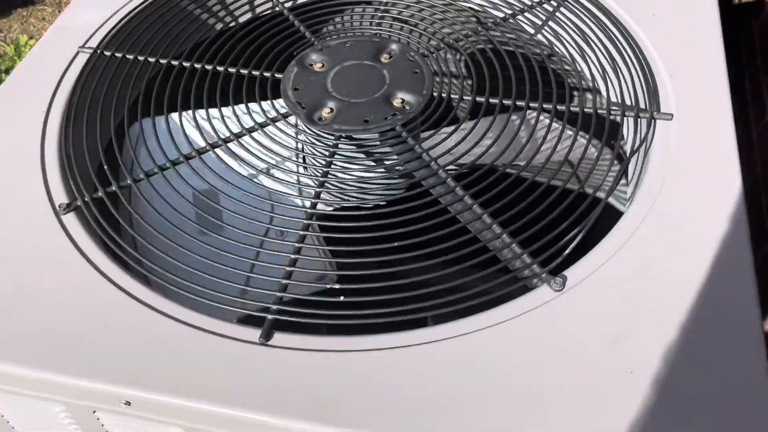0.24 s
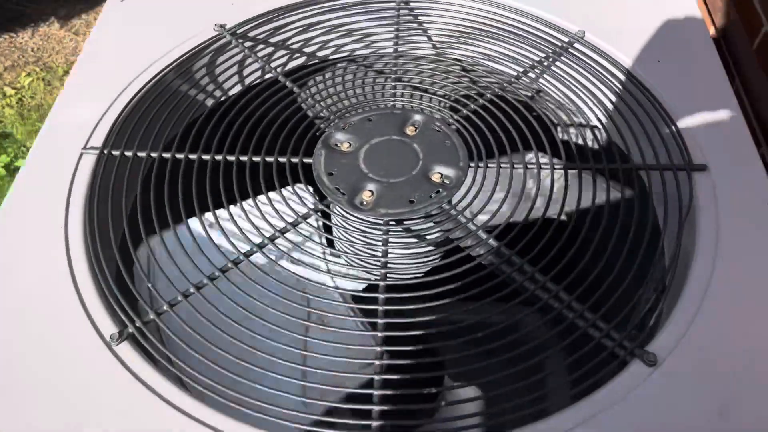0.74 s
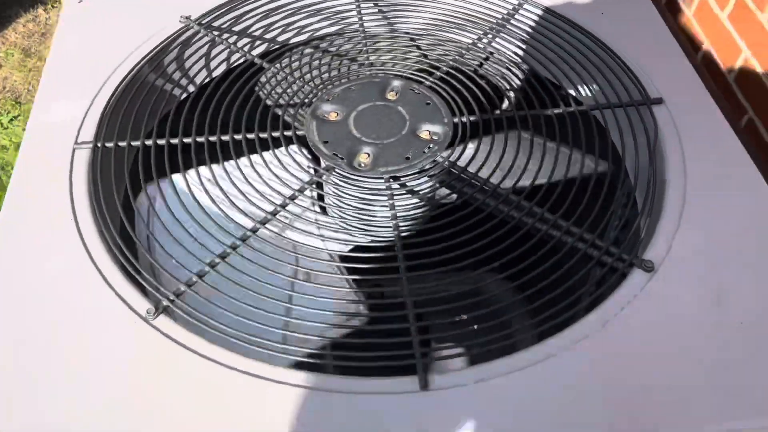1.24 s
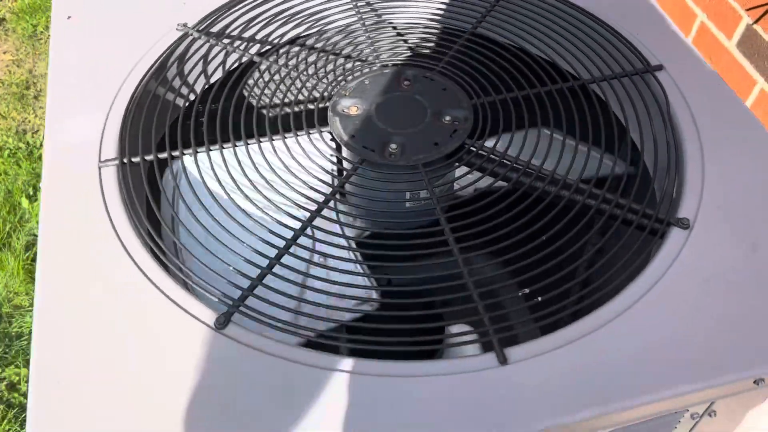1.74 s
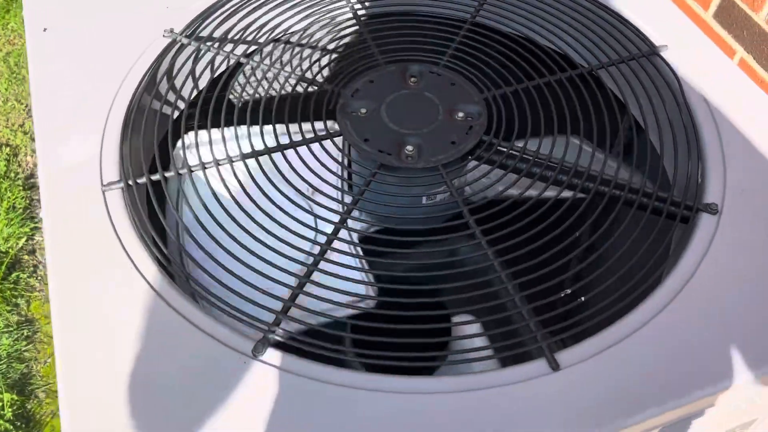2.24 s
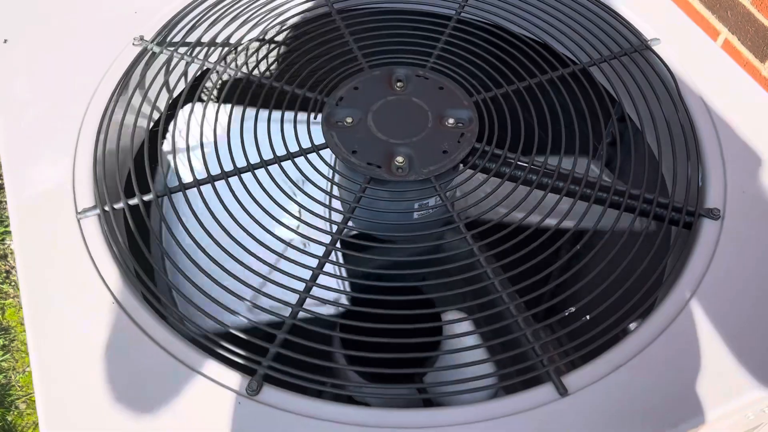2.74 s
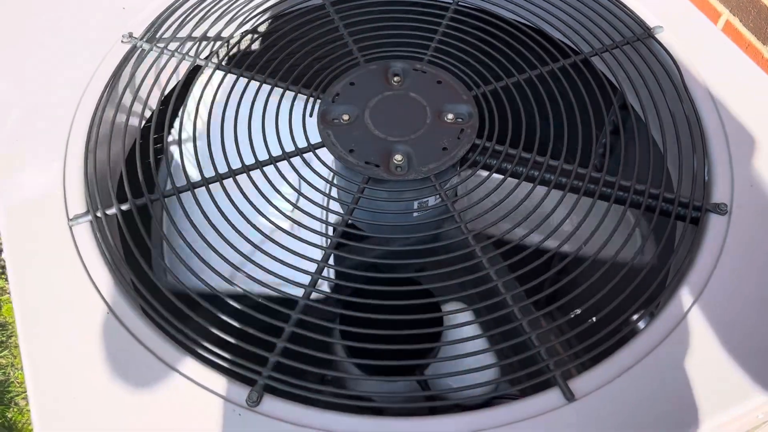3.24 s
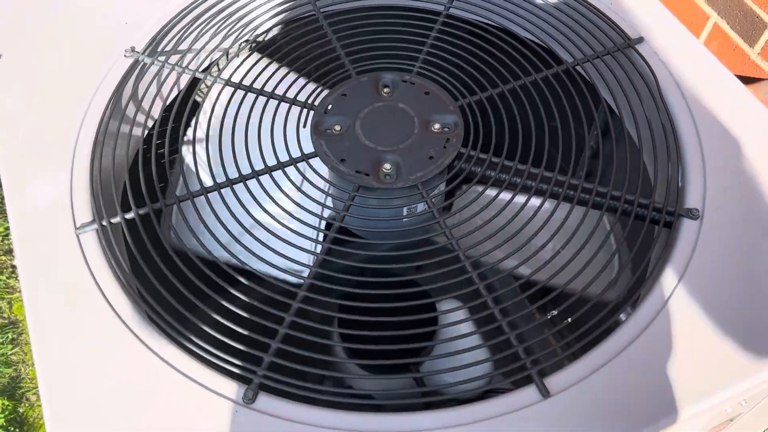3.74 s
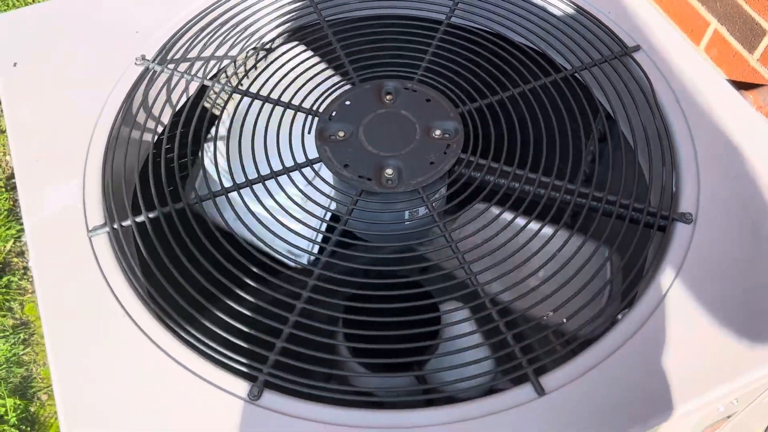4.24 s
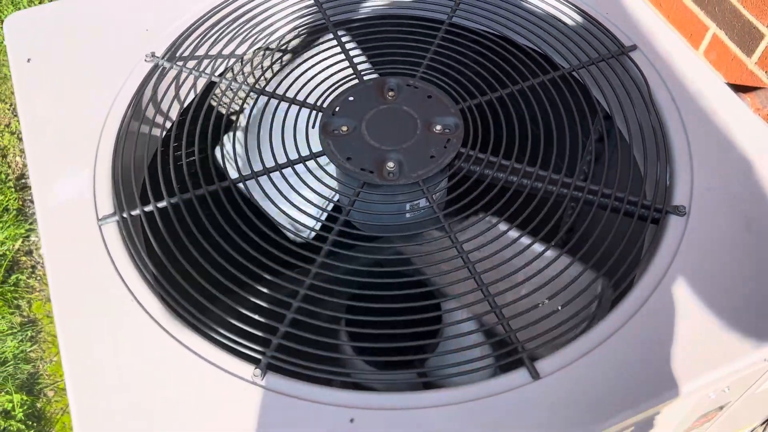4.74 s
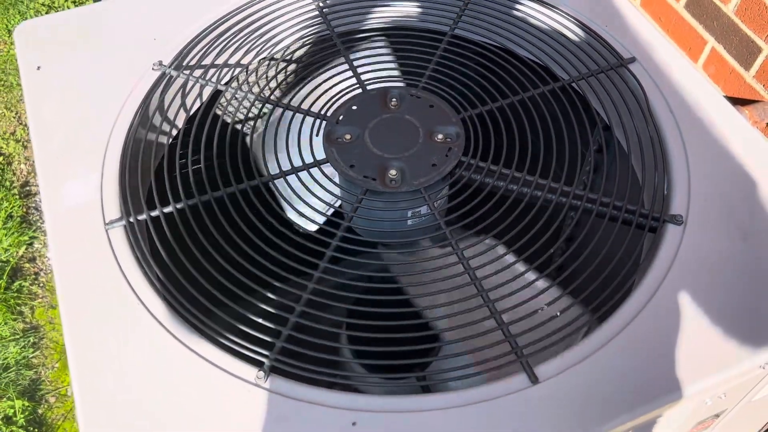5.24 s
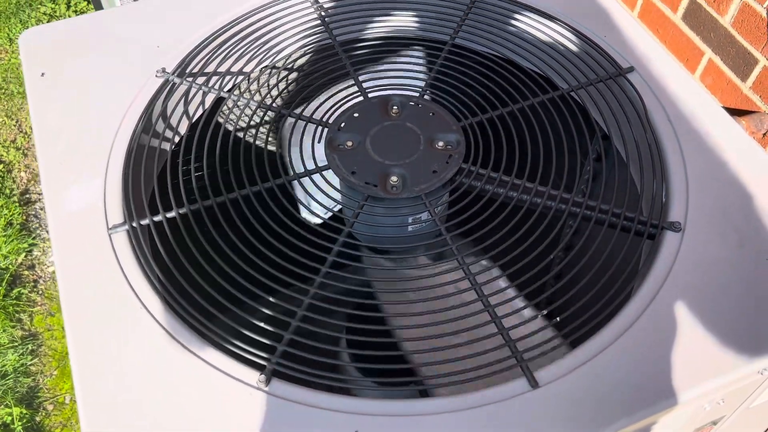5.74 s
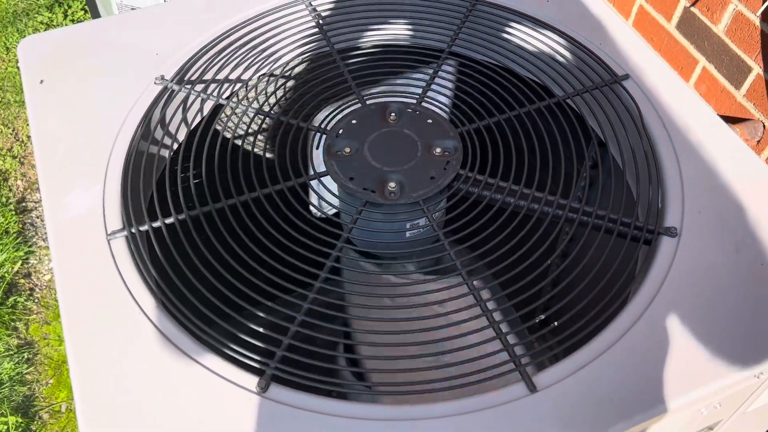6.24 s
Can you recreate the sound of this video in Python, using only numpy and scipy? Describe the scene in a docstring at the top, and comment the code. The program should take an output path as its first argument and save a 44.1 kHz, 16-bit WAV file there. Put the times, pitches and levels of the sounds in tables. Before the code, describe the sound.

Close outdoor view of an air-conditioning unit already running. A low hum and electric whine sit under a broad fan rush and a fine fluttering hiss. Within the first half second the microphone moves over the grille, the drone lessens and the fan's air begins hitting it, giving irregular thumps, puffs and short ticks several times a second until the end. Stereo, open air, no reverberation.

```python
"""A low hum and drone open the scene, with the rush of a fan: an outdoor air-conditioning unit.
The compressor whines in harmonics of its shaft, and its shell adds a dense harmonic buzz.
The fan's rush is coloured noise; a hiss and a shell ring flutter and pulse with the shaft.
As the microphone rises over the fan grille, the upward air buffets it: noise shaped into gusts,
and single eddies, each a short oscillation of falling pitch."""
import sys
import numpy as np
from scipy.fft import rfft, irfft, next_fast_len
from scipy.io import wavfile
from scipy.ndimage import map_coordinates

SR = 44100
rng = np.random.default_rng(int(sys.argv[2]) if len(sys.argv) > 2 else 0)


def put_to_file(sound):
    """Save the sound as 16-bit audio at rate SR, in the file named by the first command-line argument."""
    columns = np.atleast_2d(sound).T  # one column per channel
    safe = np.clip(columns, -1, 1)
    whole_steps = np.round(safe * 32767)
    wavfile.write(sys.argv[1], SR, whole_steps.astype(np.int16))


N = 286209

SHAFT_HZ = 59.265  # mean speed of the compressor shaft
HISS_SHELTER = 0.31  # share of the cabinet's shelter, in dB, that also dims hiss and buzz
# gusts that reach the microphone: peak t/s, length t/s (between the points 6 dB down),
# relative buffet level/dB, relative flutter level/dB
GUSTS = [(0.435, 0.093, -18, -46), (0.595, 0.047, -14.5, -25), (0.707, 0.093, -20, -28.5),
         (0.815, 0.094, -13.5, -24), (0.946, 0.078, -12, -21.5), (1.072, 0.079, -21.5, -21.5),
         (1.216, 0.044, -25, -21), (1.351, 0.13, -17, -19), (1.672, 0.024, -22.5, -36),
         (1.772, 0.1, -19.5, -21.5), (1.937, 0.054, -15, -17), (2.065, 0.068, -13, -15.5),
         (2.129, 0.036, -16, -18), (2.184, 0.047, -24, -22), (2.301, 0.074, -21, -16.5),
         (2.342, 0.035, -14.5, -24), (2.39, 0.04, -23, -19), (2.554, 0.065, -21.5, -21.5),
         (2.655, 0.092, -24.5, -22), (2.739, 0.057, -20, -18.5), (2.932, 0.063, -21, -21.5),
         (3.017, 0.048, -23, -24.5), (3.138, 0.089, -19.5, -27.5), (3.313, 0.054, -20, -19.5),
         (3.414, 0.011, -16.5, -23), (3.473, 0.073, -21.5, -21), (3.61, 0.087, -22.5, -18),
         (3.796, 0.061, -14.5, -26.5), (3.96, 0.074, -16, -24), (4.082, 0.15, -22, -21.5),
         (4.186, 0.032, -15, -22.5), (4.379, 0.083, -22, -21), (4.509, 0.094, -21, -21.5),
         (4.647, 0.11, -17.5, -26.5), (4.82, 0.087, -20, -25.5), (4.938, 0.15, -21, -26.5),
         (5.128, 0.051, -20, -23), (5.3, 0.1, -19.5, -31), (5.43, 0.11, -23, -35),
         (5.567, 0.048, -14, -19.5), (5.748, 0.2, -22, -25), (5.918, 0.055, -9, -20.5),
         (6.05, 0.14, -21, -23), (6.187, 0.16, -21, -25.5), (6.321, 0.062, -17.5, -19),
         (6.47, 0.26, -23.5, -25.5)]


def amp(db):
    """Level to amplitude ratio: 20 dB for each factor of ten."""
    return 10 ** (np.asarray(db) / 20)


def unit(x):
    """Normalisation to a root-mean-square value of 1."""
    return x / np.sqrt(np.mean(x ** 2) + 1e-20)


def along(points, hz):
    """Interpolation of (f/Hz, value) points on a logarithmic frequency axis."""
    f, v = np.transpose(points)
    return np.interp(np.log(hz + 1), np.log(f + 1), v)


def wobble(rate):
    """Slow random modulation: a smooth curve through normal random knots, rate knots a second."""
    coarse = np.linspace(0, N, 4096)
    knots = rng.standard_normal(2048)
    curve = map_coordinates(knots, [coarse * rate / SR], mode="wrap")
    return np.interp(np.arange(N), coarse, curve)


def filtered(x, response):
    """Linear filtering: the spectrum of x times a response of frequency."""
    m = next_fast_len(N + SR // 2)
    hz = np.fft.rfftfreq(m, 1 / SR)
    return irfft(rfft(x, m) * response(hz), m)[..., :N]


def panned(pan_db):
    """Stereo level difference: left and right gains, half the difference each way."""
    return amp(np.array([[.5], [-.5]]) * pan_db)


def phase_shifted(x, lead):
    """Stereo phase difference: left leads right by an angle that depends on frequency."""
    return filtered(x, lambda hz: np.exp(1j * np.array([[.5], [-.5]]) * along(lead, hz)))


def rush(spectrum, alike):
    """Partly coherent stereo noise of rms 1: mid and side mixed to a left-right correlation."""
    def colour(hz):
        turn = np.arccos(np.clip(along(alike, hz), -1, 1)) / 2
        return amp(along(spectrum, hz)) * [np.cos(turn), np.sin(turn)]

    mid, side = filtered(rng.standard_normal((2, N)), colour)
    return unit(np.array([mid + side, mid - side]))


def rotation(hz, drift):
    """Phase as the integral of frequency: turns made so far at a nearly steady speed."""
    return np.cumsum(hz * (1 + drift * wobble(3.096))) / SR


def line(turns, level_db, waver_db):
    """Amplitude modulation: a sine whose strength wavers in the moving air."""
    phase = 2 * np.pi * (turns % 1 + rng.random())
    strength = np.sqrt(2) * amp(level_db + waver_db * wobble(6))
    return strength * np.sin(phase.astype(np.float32))


def beside_db():
    """Aerodynamic shelter: weaker draught beside the cabinet, until the microphone is over the grille."""
    shelter_db, rise_s = -6, 0.3
    return shelter_db / (1 + (np.arange(N) / SR / rise_s) ** 8)


def whine(shaft):
    """Harmonic radiation: shaft orders, some of which swell and fade as the microphone moves."""
    # the compressor's hum and whine: shaft order, level/dB without a swell
    orders = [(3, -39.5), (4, -43.5), (5, -43), (6, -44.5), (9, -51), (11, -49.5), (12, -53.5), (13, -57),
              (14, -57), (15, -50), (16, -47), (17, -54), (18, -51.5), (19, -65), (20, -58), (21, -52),
              (22, -48.5), (22.5, -50), (23, -50.5), (24, -49), (25, -53), (26, -48.5), (27, -48),
              (29, -68.5), (68, -66), (70, -68), (96.5, -62.5), (97, -67)]
    # bounds of each line's swell: shaft order, lower t/s, upper t/s, boost level/dB;
    # crossed bounds give almost none
    swells = [(3, 0, 0.39, 12.5), (4, -0.5, 0.53, 6), (5, 0, 0.38, 6.5), (12, 3, 4, 8), (13, -3, 2.1, 8.5),
              (14, -3, 3.9, 11), (16, 1.1, 2.4, 4), (17, -2, 1.43, 6), (18, 1.2, 2.33, 9),
              (20, -0.5, 3.6, 12), (22, 0.9, 2.4, 7.5), (22, 3.5, 7, 10), (23, 2.3, 3.3, 11.5),
              (24, 1, 0.85, 10), (29, 1, 0.36, 17)]
    # the whine in stereo: f/Hz, left-right level/dB
    whine_pan = [(700, -0.5), (1000, -6), (1400, -3.5), (2500, 0)]
    # stereo phase of the whine: f/Hz, left lead/rad
    whine_phase = [(900, -.1), (1350, -.8), (1540, -1.5), (1600, -2.5), (1720, -.3)]
    fade_s = 0.17  # time to rise into or sink out of a swell
    t = np.arange(N) / SR
    out = np.zeros(N)
    for k, db in orders:
        order = round(2 * k) / 2  # whole and half orders
        boost_db = 0
        for which, lower, upper, boost in swells:
            if round(which) == order:
                inside = np.clip(.5 + np.minimum(t - lower, upper - t) / fade_s, 0, 1)
                boost_db = boost_db + boost * inside
        # a line is steadier while it swells
        out += line(order * shaft, db + boost_db, waver_db=2.3 * amp(-boost_db))
    return filtered(phase_shifted(out, whine_phase), lambda hz: panned(along(whine_pan, hz)))


def shell_buzz(shaft, size=8192, count=5):
    """Fourier synthesis: high harmonics and weak half orders, whose pattern changes with position."""
    # the high harmonics that buzz in the compressor shell: f/Hz, relative level/dB of each line
    shell = [(1650, -70), (2000, -60.5), (2300, -73), (2900, -63.5), (3600, -72.5), (4200, -73),
             (4800, -64), (5200, -91), (5780, -69.5), (6200, -69.5), (7200, -97)]
    k = np.arange(size // 2 + 1)
    hz = k * SHAFT_HZ / 2
    level_db = along(shell, hz) - 7 * (k % 2)  # odd k are the half orders
    inside = (hz > shell[0][0]) & (hz < shell[-1][0])
    scatter = rng.standard_normal((count, 3, len(k), 2)) @ [1, 1j] / np.sqrt(2)
    # one field common to both channels, and one for each
    ears = (scatter[:, :1] + 0.86 * scatter[:, 1:]) * amp(level_db) * inside
    # each waveform lasts two turns of the shaft
    cycles = irfft(ears, size) * size / 2
    place = (shaft / 2 % 1 * size).astype(int)
    position = np.linspace(0, count - 1, N)
    buzz = np.zeros((2, N))
    for i, cycle in enumerate(cycles):
        # equal-power crossfade from one pattern to the next
        share = np.sqrt(np.clip(1 - abs(position - i), 0, 1))
        buzz += cycle[:, place] * share
    return amp(HISS_SHELTER * beside_db()) * panned(4.2) * buzz


def fan_and_hiss(shaft):
    """Modulated broadband noise: a smooth rush; a hiss and shell ring that flutter and pulse with the shaft."""
    # the fan's rush: f/Hz, relative spectral density level/dB per Hz
    fan_band = [(30, -6), (100, 10.5), (300, 0.5), (700, 1.5), (1100, 1), (1350, 2), (1580, 1.5),
                (1720, -9), (2200, -14.5), (3000, -19.5), (6000, -32), (14000, -31)]
    # its hiss: f/Hz, relative spectral density level/dB per Hz
    hiss_band = [(1500, -23), (2700, 3.5), (4600, 2.5), (5350, 3), (5800, -3), (6450, 1), (6850, 6),
                 (7400, -4), (8500, 2), (9500, -4), (11400, -7), (13800, -9.5), (15000, -31)]
    # resonance of the shell's bright ring: f/Hz, relative spectral density level/dB per Hz
    ring_band = [(4900, -33.5), (5550, -8.5), (5780, 0.5), (6050, -5.5), (6700, -24)]
    # the ring comes and goes with the listening position: t/s, relative level/dB
    ring_course = [(0.25, -61), (0.45, -46.5), (1.0, -40), (1.2, -54), (1.8, -53), (2.4, -48), (6.49, -48)]
    # stereo likeness of the unit's noise: f/Hz, left-right correlation
    unit_alike = [(100, .85), (700, .65), (1100, .15), (1600, .4), (2050, .85), (3200, .85), (5200, .55),
                  (6700, .97), (8500, .75), (9050, 1), (10750, 1), (12000, .93)]
    # the same noise: f/Hz, left-right level/dB
    unit_pan = [(300, 3.5), (900, 1), (1250, -4.5), (1600, -0.5), (1730, 4), (2100, -1), (3200, 2),
                (4100, 3.5), (5300, 2), (7000, 0.5)]
    flutter_hz = 27.92
    recede_db = 3  # the fan's rush softens over the whole scene

    unrest_db = 0.5 * wobble(2.2) + 1.0 * wobble(22)
    fan_db = -31.0 - recede_db * np.linspace(-.5, .5, N) + unrest_db
    fan = amp(fan_db) * rush(fan_band, unit_alike)

    beat = 2 * np.pi * rotation(flutter_hz, drift=0.0077)
    # each flutter rises faster than it falls
    flutter_db = 2.03 * (1 + 0.19 * wobble(3.27)) * (np.sin(beat) + 0.47 * np.sin(2 * beat))
    # once and twice a turn
    stroke_db = 0.83 * np.cos(2 * np.pi * shaft) + 1.0 * np.cos(4 * np.pi * shaft)

    hiss_db = -46.0 + HISS_SHELTER * beside_db() + 0.6 * wobble(12)
    hiss = amp(hiss_db) * rush(hiss_band, unit_alike)
    ring_s, ring_db = np.transpose(ring_course)
    ring_db = np.interp(np.arange(N) / SR, ring_s, ring_db) - 6.5 + 3.3 * wobble(120)
    ring = amp(ring_db) * rush(ring_band, unit_alike)
    noise = fan + amp(flutter_db + stroke_db) * (hiss + ring)
    return filtered(noise, lambda hz: panned(along(unit_pan, hz)))


def fan_drone():
    """Pure-tone radiation: the fan's low drone, stronger beside the cabinet."""
    drone_hz, drone_db = 53.3, -33  # level over the grille
    return line(drone_hz * np.arange(N) / SR, drone_db - beside_db(), waver_db=0.5)


def gusts():
    """Turbulent pressure on the microphone: a deep buffeting with a lumpy flutter above it."""
    # the wind's buffeting: f/Hz, relative spectral density level/dB per Hz
    buffet_band = [(15, -29), (30, -18.5), (50, -4.5), (70, -0.5), (100, -5), (160, -8), (250, -17.5),
                   (500, -26.5), (1200, -104.5)]
    # the wind's flutter: f/Hz, relative spectral density level/dB per Hz
    flutter_band = [(60, -32), (150, -3), (260, 4.5), (420, 1.5), (650, -3), (1000, -13), (2000, -27.5),
                    (4000, -98)]
    # stereo likeness of the wind: f/Hz, left-right correlation
    air_alike = [(50, 1), (150, 0.77), (400, 0.79), (900, 0.29)]
    calm_buffet_db, calm_flutter_db = -29.5, -34.5  # relative levels of the draught between the gusts
    flutter_lead_s = 0.0075  # the fine turbulence arrives ahead of the deep push
    _, _, buffet_db, flutter_db = np.transpose(GUSTS)

    lumps = amp(2.5 * wobble(35))
    buffet = amp(0.6) * unit(lumps * rush(buffet_band, air_alike))
    churn = amp(-4) * unit(amp(4.7 * wobble(90)) * rush(flutter_band, air_alike))
    flutter = churn + amp(-1) * small_eddies(pitch_hz=569, scatter_db=4.5)
    deep = gust_strength(buffet_db, calm_buffet_db, 0) * buffet
    fine = gust_strength(flutter_db, calm_flutter_db, flutter_lead_s) * flutter
    return amp(beside_db()) * (deep + fine)


def gust_strength(levels_db, calm_db, lead_s):
    """Incoherent addition: the powers of bell-shaped gusts add to that of the draught."""
    t = np.arange(0, N, 64) / SR
    power = amp(calm_db) ** 2
    for (s, length, *_), db in zip(GUSTS, levels_db):
        power = power + amp(db) ** 2 * np.exp(-5.5 * ((t + lead_s - s) / length) ** 2)
    return np.interp(np.arange(N) / SR, t, np.sqrt(power))


def small_eddies(pitch_hz, scatter_db, count=640):
    """Superposition of random events: a dense, irregular stream of small eddies, rms 1."""
    times = (np.arange(count) + rng.random(count)) / count * (N - 1) / SR
    size, pitch, life = np.clip(rng.standard_normal((3, count)), -2, 2)
    pitches = pitch_hz * np.exp(.3 * pitch)
    lengths = 3.02 * np.exp(0.17 * life)  # cycles
    return unit(eddies(zip(times, scatter_db * size, pitches, lengths)))


def strong_eddies():
    """Transient vortex pressure: the strongest eddies, from deep thumps to short, high ticks."""
    # onset t/s, relative peak level/dB, starting f/Hz, length/cycles
    eddy_rows = [(0.394, -6.5, 484, 3.15), (0.412, -7.5, 246, 2.4), (0.429, -8.5, 180, 2.4),
                 (0.788, -7, 300, 2.7), (0.81, -10.5, 300, 4.7), (0.904, -11, 616, 6.1),
                 (0.911, -8, 580, 2.3), (1.295, -16.5, 680, 11), (1.312, -12, 700, 2.4),
                 (1.361, -10.5, 780, 7.1), (1.383, -11, 500, 2), (1.786, -5.5, 830, 4.6),
                 (1.8, -6.5, 151.5, 2.5), (1.884, -8.5, 855, 4.7), (1.91, -17, 677, 4),
                 (1.955, -9, 1060, 3.7), (1.995, -10, 950, 3.2), (2.037, -16, 594, 2.4),
                 (2.041, -5.5, 790, 1.84), (2.11, -14, 1040, 4.7), (2.067, -17, 420, 3),
                 (2.127, -6.5, 496, 1.4), (2.2855, -8.5, 1940, 5.2), (2.72, -15, 460, 2.2),
                 (3.144, -13.5, 500, 2.1), (3.288, -13, 420, 2.4), (3.32, -8, 465, 3.8),
                 (3.399, -12, 860, 4.2), (3.544, -10, 630, 4.6), (3.574, -7, 896, 4.3),
                 (3.583, -11.5, 2870, 2.6), (3.585, -4, 570, 2.44), (3.793, -7, 1800, 5.7),
                 (3.922, -10.5, 1000, 5), (3.985, -7.5, 488, 2.8), (4.056, -11.5, 480, 2.3),
                 (4.079, -13, 910, 2.4), (4.176, -10, 940, 3.4), (4.638, -3.5, 334, 2.17),
                 (4.638, -7, 830, 3.5), (4.885, -12.5, 2220, 2.2), (4.886, -3.5, 800, 3.1),
                 (4.894, -5.5, 144, 3.2), (5.12, -16.5, 900, 3.2), (5.134, -12, 208, 2.6),
                 (5.273, -13.5, 990, 4.8), (5.297, -13, 970, 3.9), (5.542, -16.5, 900, 6.8),
                 (5.573, -11.5, 422, 4), (5.823, -12, 770, 4.6), (5.873, -9.5, 1110, 3.6),
                 (6.021, -13, 980, 2.4), (6.146, -10, 1130, 3.1), (6.15, -6.5, 250, 1.9),
                 (6.388, -11, 1200, 4.1), (6.392, -4, 484, 1.83)]
    return panned(1.8) * eddies(eddy_rows)


def eddies(rows, ragged=0.31, spread=0.95):
    """Downward frequency sweep: a few pressure swings, every one slower than the last."""
    # swings lengthen at this rate per cycle, and faster the higher an eddy starts
    base_slowing, slowing_hz = 0.2704, 9960
    top_hz = 2700  # upper edge of the eddies' sound, which keeps their onsets soft
    t = np.arange(SR // 14) / SR
    out = np.zeros((2, N + len(t)))
    for s, db, hz, length in rows:
        slowing = base_slowing + hz / slowing_hz
        cycles = np.log1p(slowing * hz * t) / slowing
        stereo_angle = np.array([[.5], [-.5]]) * spread * rng.uniform(-0.85, 1)
        phase = 2 * np.pi * rng.random() + stereo_angle
        # random roughness that slows with the swings
        grit = map_coordinates(rng.standard_normal(40), [3 * cycles], mode="nearest")
        # strength rises from nothing and sinks back over the length
        swell = abs(np.sin(np.pi * np.minimum(cycles / length, 1))) ** 0.72
        swings = np.sin(2 * np.pi * cycles + phase) + ragged * grit
        start = round(s * SR)
        out[:, start:start + len(t)] += amp(db) * swell * swings
    return filtered(out[:, :N], lambda hz: 1 / np.sqrt(1 + (hz / top_hz) ** 10))


def scene():
    """Linear superposition: the machine below, the wind at the microphone."""
    # stereo phase of the unit's noise: f/Hz, left lead/rad
    unit_phase = [(900, -.1), (1550, -2.4), (1800, -.1), (3000, 1.1), (5700, -.65), (7200, 0), (8500, -1.8),
                  (9050, -3.14), (10750, -3.14), (11300, -5.6), (13500, -6.3), (14900, -8.4)]
    shaft = rotation(SHAFT_HZ, drift=0.000406)
    noise = phase_shifted(shell_buzz(shaft) + fan_and_hiss(shaft), unit_phase)
    wind = gusts() + strong_eddies()
    return whine(shaft) + noise + fan_drone() + wind


def record(dry):
    """Band-limiting and saturation: deep rumble is thinned, peaks are rounded, the top is cut off."""
    corner_hz, top_hz = 30, 14900
    thin = filtered(dry, lambda hz: hz ** 2 / np.sqrt(hz ** 4 + corner_hz ** 4))
    rounded = thin / (1 + abs(thin / .95) ** 6) ** (1 / 6)
    return filtered(rounded, lambda hz: hz < top_hz)


dry = scene()
out = record(dry)
put_to_file(out)
```